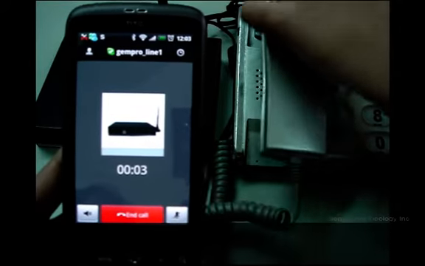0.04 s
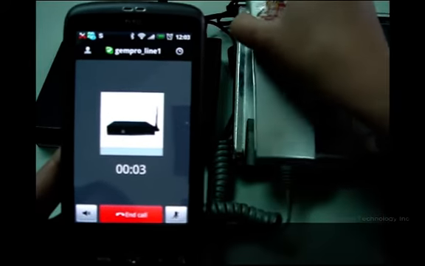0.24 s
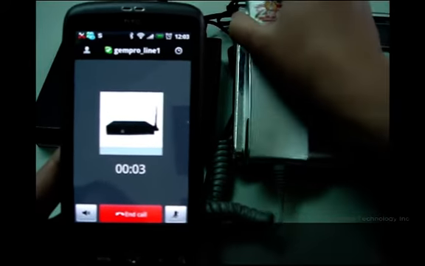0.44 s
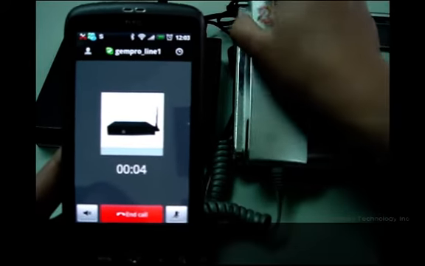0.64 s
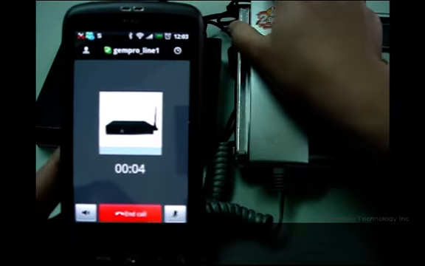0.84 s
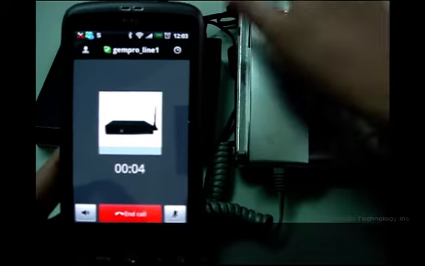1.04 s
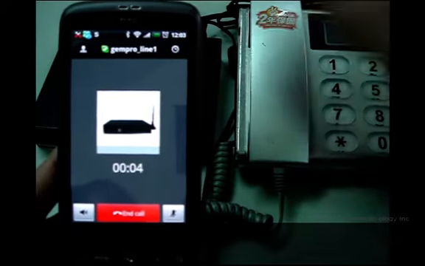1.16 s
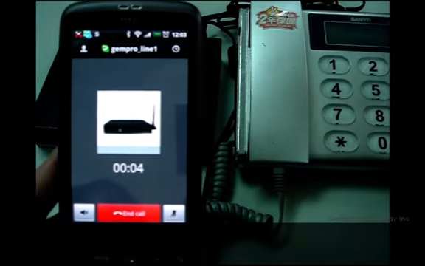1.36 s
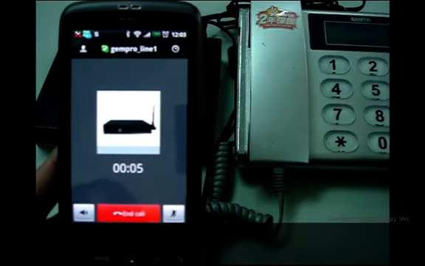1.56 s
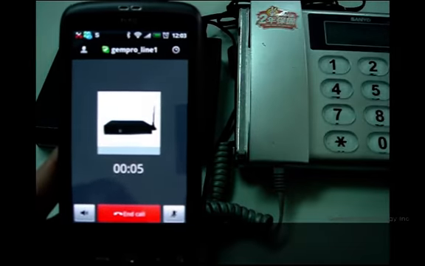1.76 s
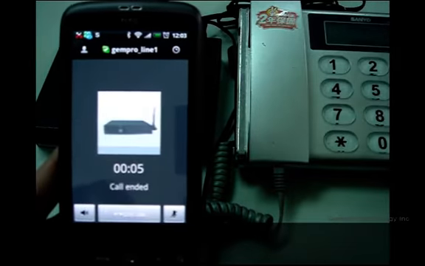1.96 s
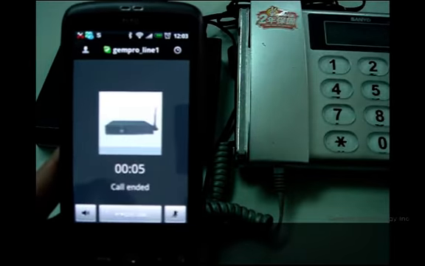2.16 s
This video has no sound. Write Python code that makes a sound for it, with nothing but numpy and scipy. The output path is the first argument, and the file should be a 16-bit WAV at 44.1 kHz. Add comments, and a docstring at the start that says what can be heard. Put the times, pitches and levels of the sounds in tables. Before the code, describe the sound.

A telephone is hung up, its handset bumping, clacking and rattling into place.

```python
"""Hanging up a telephone

In a small quiet room a plastic handset brushes and bumps its base, clacks down at each end, rattles into
its seat and gives a last tick. Each impact excites brief modes of the hollow shells and longer ones of
the base; thin metal sings in the hook switch, the desk hums, and a low rumble lies under it all."""
import sys
import numpy as np
from scipy import signal
from scipy.fft import rfft, irfft
from scipy.io import wavfile

SR = 44100
rng = np.random.default_rng(int(sys.argv[2]) if len(sys.argv) > 2 else 0)


def wrap_up_sound(samples):
    """Save the sound to the file named by the first command line argument, as 16-bit audio."""
    columns = np.atleast_2d(samples).T
    # keep every value between -1 and 1, then stretch to whole-number steps
    tamed = np.clip(columns, -1, 1)
    steps = np.round(tamed * 32767).astype(np.int16)
    wavfile.write(sys.argv[1], SR, steps)


N = 97020

# Impacts of handset on cradle: (time [s], level [dB], bass [dB], treble [dB], favoured resonance [Hz],
# its lift [dB], feed to base modes and room [dB], shell T60 at 1 kHz [s])
IMPACTS = [ (0.1412, -40.5, -2, 1, 980, 24, 1, 0.05), (0.2130, -31, 6, 4, 887, 6.5, 2.5, 0.046),
           (0.2143, -24, 2, -12.5, 439, 15.5, 2, 0.034), (0.2234, -34.5, 1, -7, 490, 20, -9, 0.032),
           (0.3520, -20.5, -24, 5.5, 3550, 12.5, -4.5, 0.02), (0.3562, -21, -8.5, 3.5, 1080, 8, 3, 0.05),
           (0.364, -29, 8.5, -5, 4150, 12.5, 4.5, 0.071), (0.3759, -22.5, 0, 5.5, 4240, 7, -3, 0.044),
           (0.3792, -24, -4, -1, 950, 5.5, 3, 0.028), (0.3835, -23.5, 0, 8.5, 7060, 15, -6.5, 0.022),
           (0.3889, -22.5, -9, -11, 1010, 11, -0.5, 0.022), (0.3985, -34.5, 14.5, -8, 340, 11.5, 1, 0.051),
           (0.4080, -29, -3, 11.5, 6400, 6, -4, 0.016), (0.5316, -19, -6, 6, 998, 11.5, -0.5, 0.029),
           (0.5352, -23.5, -4, 6.5, 1170, 15.5, -0.5, 0.027), (0.5390, -26, -9, -3, 832, 18.5, -1, 0.027),
           (0.5490, -26, -15, 8.5, 1010, 5, -1, 0.032), (0.5509, -30, 13, -19, 1403, 15, -5, 0.075),
           (0.5600, -27, 10, -23, 972, 6.5, 1.5, 0.066), (0.5653, -24.5, 0, -9.5, 3845, 13, 1.5, 0.063),
           (0.5697, -23.5, -12, -19, 1400, -1, -7, 0.043), (0.5788, -28, -5, 0, 6430, 17, 4.5, 0.043),
           (0.6361, -26.5, -14, 8, 2570, 18, -12, 0.01), (0.6393, -36, -6, 18, 2360, 25.5, -8.5, 0.033),
           (0.6558, -22.5, -7, 1, 1980, 11.5, -8.5, 0.022), (0.6583, -32, 13.5, -12, 3206, 16, -11, 0.041),
           (0.6665, -39.5, -17, 0, 3060, 20, -28, 0.067), (0.6740, -32, -22, 6.5, 1866, 8.5, -12, 0.042),
           (0.7850, -43, -9.5, 2, 2340, 18.5, -13, 0.036), (0.78715, -41, -8, 12.5, 2280, 15, -13, 0.031),
           (0.9150, -49.5, 8.5, -10, 520, 25, -2, 0.026), (1.0400, -67, 1, -17, 335, 6, -18, 0.039)]
# Spectral envelope of the plastic shells: (frequency [Hz], relative spectral density [dB])
SHELL_SPECTRUM = [(120, -59), (250, -4.5), (400, -2.5), (650, 1), (1000, 2.5), (1500, 1), (2200, -1),
                  (3000, -4.5), (4200, -4.5), (5300, -12.5), (7000, -16), (9500, -25), (12000, -34.5),
                  (14000, -30)]
BASS_HZ, TREBLE_HZ, CUTOFF_HZ = 530, 4630, 14200
FRICTION_FADE_S = 0.0025


def from_db(db):
    """Amplitude ratio of a level in decibels."""
    return 10 ** (np.asarray(db) / 20)


def at_hz(points, hz):
    """Interpolation of (frequency, value) points on a logarithmic frequency axis."""
    known_hz, values = np.transpose(points)
    return np.interp(np.log(np.maximum(hz, 1)), np.log(known_hz), values)


def add(out, start_s, sound):
    """Superposition: a sound adds to the mix from its start time on."""
    i = int(start_s * SR)
    out[i:i + len(sound)] += sound[:N - i]


def contact_colour(hz, bass_db, treble_db, favoured_hz, lift_db, width_octaves=0.23):
    """Selective excitation: where and how hard the shells meet weights bass, treble and one band."""
    favour = np.exp(-.5 * (np.log2(hz / favoured_hz) / width_octaves) ** 2)
    low = 1 / (1 + (hz / BASS_HZ) ** 4)
    high = 1 / (1 + (TREBLE_HZ / hz) ** 6)
    return from_db(bass_db * low + treble_db * high + lift_db * favour)


def shells(count=330, crack_hz=4960, cluster_above_hz=970, mode_rise_cycles=0.52):
    """Modal ringing: impacts excite dense, damped modes of the plastic. Gives direct sound, room feed."""
    t, direct, feed = np.arange(SR // 26) / SR, np.zeros(N), np.zeros(N)
    hz = np.linspace(np.sqrt(120), np.sqrt(CUTOFF_HZ), count) ** 2
    hz += np.gradient(hz) * (rng.random(count) - .5) / 2
    weight = from_db(at_hz(SHELL_SPECTRUM, hz)) * hz ** .25  # sparser modes each carry more energy
    weight *= from_db(6.5) / np.linalg.norm(weight)
    damping = np.log(1000) * (hz / 1000) ** 0.027  # high modes die slightly sooner
    tones = np.exp(np.outer(2j * np.pi * hz, t))
    losses = np.outer(damping, t)
    # A share of every mode starts in phase: the crack of the first instant.
    crack = from_db(-2.5) / np.sqrt(count) / np.sqrt(1 + (hz / crack_hz) ** 2)
    for start_s, db, bass_db, treble_db, favoured_hz, lift_db, feed_db, t60 in IMPACTS:
        # A high favoured resonance rings mostly as a cluster, a low one mostly as a single mode.
        cluster_share = 1 / (1 + (cluster_above_hz / favoured_hz) ** 2)
        whole = weight * contact_colour(hz, bass_db, treble_db, favoured_hz, lift_db)
        sizes = weight * contact_colour(hz, bass_db, treble_db, favoured_hz, lift_db * cluster_share)
        strengths = sizes * (np.exp(2j * np.pi * rng.random(count)) + crack)
        crowd = (strengths @ (tones * np.exp(-losses / t60))).imag
        crowd_energy = np.sum(sizes ** 2 * t60 / damping) * SR / 4
        crowd *= np.sqrt(crowd_energy) / np.linalg.norm(crowd)
        mode_size = np.sqrt(max(np.sum(whole ** 2 - sizes ** 2), 0))
        mode = mode_size * np.sin(2 * np.pi * favoured_hz * t)
        mode *= np.exp(-np.interp(favoured_hz, hz, damping) * t / t60)
        mode *= 1 - np.exp(-t * favoured_hz / mode_rise_cycles)
        rise_s = 0.00014 * from_db((-24.5 - db) / 2)  # softer impacts swell more slowly
        sound = from_db(db) * (crowd + mode) * (1 - np.exp(-t / rise_s))
        add(direct, start_s, sound)
        add(feed, start_s, sound * from_db(feed_db))
    return direct, feed


def base(coupling_db=-1, rise_s=0.0044):
    """Free vibration: the same impacts leave a few lightly damped modes of the base ringing."""
    # Modes of the base: (frequency [Hz], relative level [dB], T60 [s])
    modes = [(317, -28, .2), (347, -20.5, 0.23), (631, -22, 0.54), (822, -20, 0.16), (894, -23.5, 0.21),
             (891, -16.5, 0.14), (1050, -29, 0.18), (1418, -19.5, .24), (1580, -6.5, 0.095),
             (2095, -23.5, 0.5), (2534, -13.5, 0.15), (3504, -22, 0.21), (4009, -20.5, 0.2),
             (4290, -19.5, 0.17)]
    t, out = np.arange(SR // 2) / SR, np.zeros(N)
    hz, mode_db, t60 = np.transpose(modes)
    rings = np.exp(np.outer(2j * np.pi * hz - np.log(1000) / t60, t)) * (1 - np.exp(-t / rise_s))
    for start_s, db, *colour, feed_db, _ in IMPACTS:
        sizes = from_db(coupling_db + db + mode_db + feed_db) * contact_colour(hz, *colour)
        phases = np.exp(2j * np.pi * rng.random(len(modes)))
        add(out, start_s, ((sizes * phases) @ rings).imag)
    return out


def slides(slips_per_s=2500):
    """Stick-slip friction: plastic brushes plastic in tiny random slips, coloured by the shells."""
    # Strokes along the cradle: (start [s], duration [s], level [dB], low-pass corner [Hz])
    strokes = [(0.134, 0.034, -41, 3100), (0.189, 0.03, -33.5, 3380), (0.239, 0.125, -44.5, 2820)]
    t, hz, out = np.arange(N) / SR, np.fft.rfftfreq(N, 1 / SR), np.zeros(N)
    slips = (rng.random(N) < slips_per_s / SR) * rng.standard_normal(N)
    spectrum = rfft(slips) * from_db(at_hz(SHELL_SPECTRUM, hz)) * hz / (hz + BASS_HZ)
    for start_s, length_s, db, dull_hz in strokes:
        rub = irfft(spectrum / (1 + (hz / dull_hz) ** 2), N)
        gate = np.clip(np.minimum(t - start_s, start_s + length_s - t) / FRICTION_FADE_S, 0, 1)
        out += from_db(db) * rub / rub.std() * gate
    return out


def hook_spring(count=14, low_hz=6220, high_hz=7160, t60=0.4):
    """Beating: close, high modes of a thin metal part interfere as they fade."""
    # Blows that set the metal singing: (time [s], level [dB])
    hits = [(0.384, -41), (0.578, -38)]
    t, out = np.arange(SR // 2) / SR, np.zeros(N)
    for start_s, db in hits:
        offsets, phases = rng.random((2, count))
        hz = low_hz + (high_hz - low_hz) * (np.arange(count) + offsets) / count
        tones = np.sin(2 * np.pi * (np.outer(t, hz) + phases)).sum(axis=1) / np.sqrt(count / 2)
        add(out, start_s, from_db(db) * tones * np.exp(-np.log(1000) * t / t60))
    return out


def desk(hz=229.1, t60=0.49, rise_s=0.045):
    """Structure-borne sound: heavier pushes through the base make one low desk mode swell and fade."""
    # Pushes on the desk: (time [s], level [dB])
    pushes = [(0.222, -29), (0.384, -50), (0.564, -37.5)]
    t, out = np.arange(SR // 2) / SR, np.zeros(N)
    hum = np.sin(2 * np.pi * hz * t) * np.exp(-np.log(1000) * t / t60) * (1 - np.exp(-t / rise_s))
    for start_s, db in pushes:
        add(out, start_s, from_db(db) * hum)
    return out


def handling(end_s=0.135, level_db=-46.5, centre_hz=173):
    """Friction noise: the moving hand and cord murmur in one low octave until the handset touches."""
    octave = [centre_hz / np.sqrt(2), centre_hz * np.sqrt(2)]
    noise = signal.sosfilt(signal.butter(2, octave, "band", fs=SR, output="sos"), rng.standard_normal(N))
    gate = np.clip((end_s - np.arange(N) / SR) / FRICTION_FADE_S, 0, 1)
    return from_db(level_db) * noise / noise.std() * gate


def room(sound, build_s=0.0027):
    """Reverberation: diffuse reflections build up quickly and decay exponentially, band by band."""
    # Reverberation time: (frequency [Hz], T60 [s])
    decay_times = [(150, 1), (400, 1), (1000, 0.53), (2500, 0.76), (5000, 0.46), (8000, 0.61),
                   (14000, 0.32)]
    # Strength of the reflections: (frequency [Hz], gain [dB])
    gains = [(150, 0), (400, -6), (1000, -9.5), (2500, -2), (5000, -8), (8000, -8.5), (14000, 6)]
    t, response = np.arange(SR) / SR, np.zeros(SR)
    edges = np.geomspace(100, 16000, 15)
    for low, high in zip(edges, edges[1:]):
        hz = np.sqrt(low * high)
        bandpass = signal.butter(2, [low, high], "band", fs=SR, output="sos")
        band = signal.sosfilt(bandpass, rng.standard_normal(SR))
        band *= np.exp(-np.log(1000) * t / at_hz(decay_times, hz)) * (1 - np.exp(-t / build_s))
        band *= np.sqrt(2 * (high - low) / SR / np.sum(band ** 2))  # unit gain within the band
        response += band * from_db(at_hz(gains, hz))
    return signal.fftconvolve(sound, response)[:N]


def background(noise_db=-47.5, whine_hz=7400, whine_db=-73):
    """Stationary noise: a low rumble and soft hiss, with a faint electronic whine."""
    # Spectrum of rumble and hiss: (frequency [Hz], relative spectral density [dB])
    spectrum = [(30, -26), (70, -7), (95, -10), (120, -3), (180, 0.5), (240, -7), (340, -4), (450, -17.5),
                (640, -13), (1350, -13), (2000, -17.5), (2700, -19), (3400, -24), (5500, -28),
                (7700, -30.5), (11000, -37.5), (14000, -39.5)]
    colour = from_db(at_hz(spectrum, np.fft.rfftfreq(N, 1 / SR)))
    noise = irfft(rfft(rng.standard_normal(N)) * colour, N)
    whine = np.sin(2 * np.pi * whine_hz * np.arange(N) / SR)
    return from_db(noise_db) * noise / noise.std() + from_db(whine_db) * whine


def scene():
    """Superposition of the direct sounds, the reverberation of clacks and brushing, and the background."""
    clacks, feed = shells()
    brushing = slides()
    direct = clacks + brushing + base() + hook_spring() + desk() + handling()
    return (direct + room(feed + brushing) + background())[None]


def record(dry, bass_cut_hz=120):
    """Band limiting: a small microphone loses the bass, and the top is cut steeply."""
    thin = signal.sosfilt(signal.butter(4, bass_cut_hz, "high", fs=SR, output="sos"), dry)
    return signal.sosfilt(signal.ellip(10, .2, 60, CUTOFF_HZ, fs=SR, output="sos"), thin)


dry = scene()
out = record(dry)
wrap_up_sound(out)
```